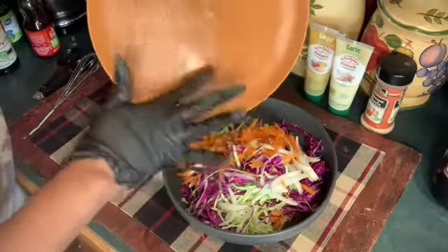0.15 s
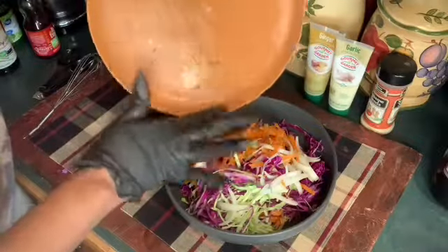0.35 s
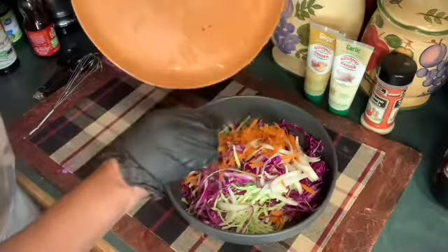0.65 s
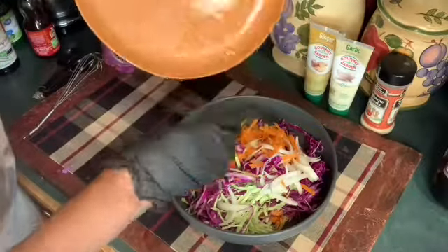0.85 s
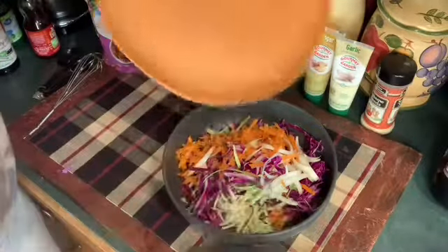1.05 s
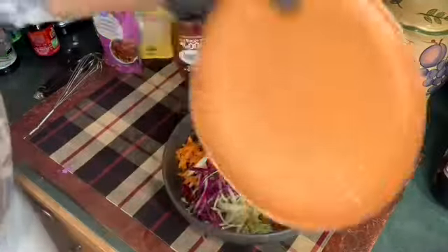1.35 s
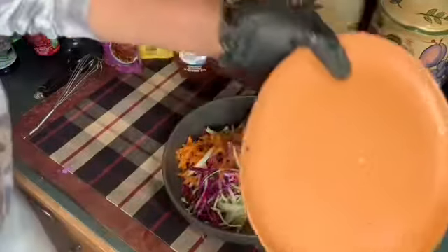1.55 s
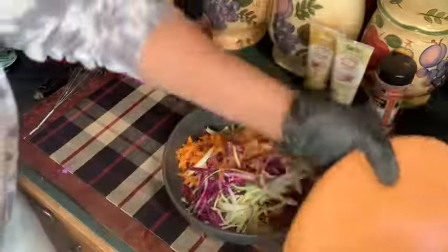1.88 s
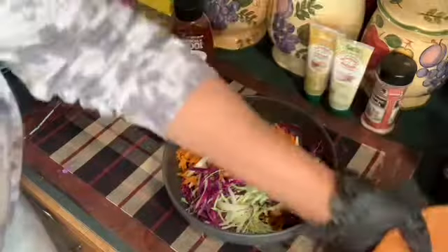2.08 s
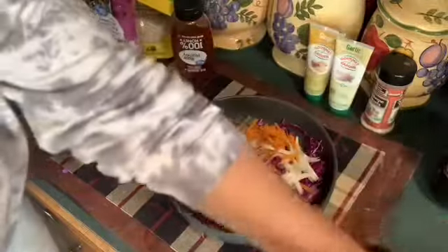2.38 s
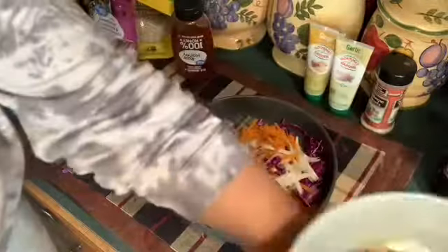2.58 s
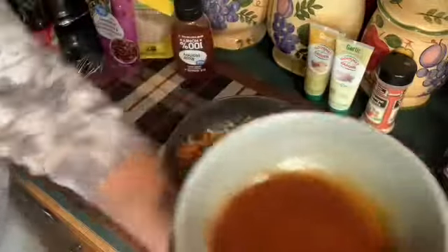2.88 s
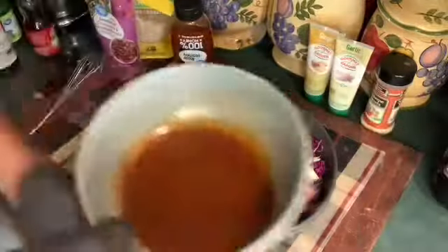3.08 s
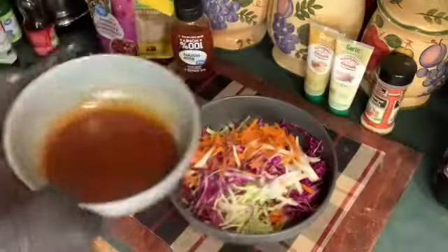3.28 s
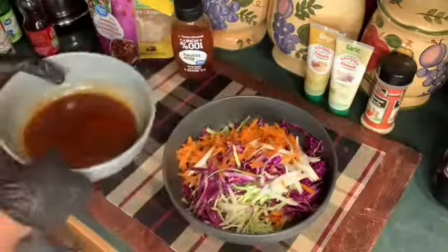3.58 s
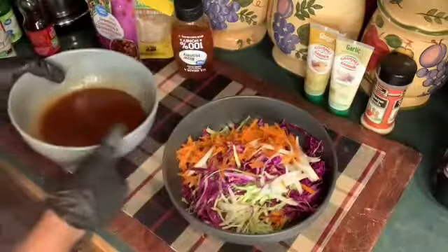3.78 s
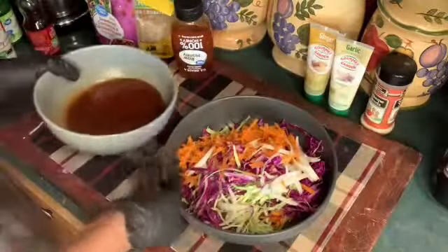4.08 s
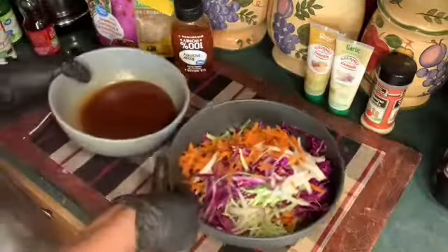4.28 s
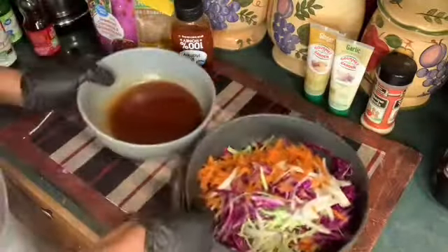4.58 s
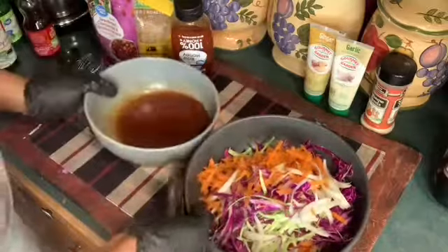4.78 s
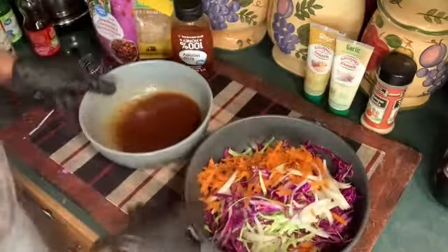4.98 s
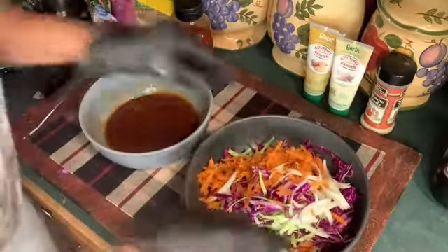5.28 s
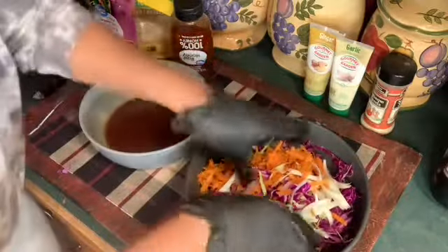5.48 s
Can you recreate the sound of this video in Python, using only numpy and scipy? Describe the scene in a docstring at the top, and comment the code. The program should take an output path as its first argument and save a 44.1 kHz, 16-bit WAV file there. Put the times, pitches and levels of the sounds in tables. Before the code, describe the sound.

Gloved hands wipe vegetable shreds off a plate with a soft, crisp rustle. The plate lands on the counter with a loud, bouncing clatter and a thud. Sleeves swish, then one dish strikes another and rattles briefly. After more faint rubbing, a salad bowl is shoved over a mat with a few dull bumps and small clicks. A fridge hums faintly throughout in the small kitchen, heard close up in stereo.

```python
"""Plate and bowls in a quiet kitchen

Close to a phone, gloved hands wipe shreds off a plate and sleeves rustle: dense tiny slips of friction.
The plate is set down on the counter, a dish clatters as a bowl is fetched, and a salad bowl is shoved
over the mat; each blow rings damped modes. A fridge hums throughout. Two microphone ports give stereo."""
import sys
import numpy as np
from scipy import signal
from scipy.fft import rfft, irfft
from scipy.io import wavfile
from scipy.ndimage import uniform_filter1d

SR = 44100
rng = np.random.default_rng(int(sys.argv[2]) if len(sys.argv) > 2 else 0)


def digitize_waveform(pressure):
    """Quantize a signal to 16-bit integers and store it at the path in sys.argv[1].

    Rows of a 2-D input are taken as channels; values are limited to [-1, 1].
    """
    field = np.atleast_2d(pressure).T
    bounded = np.clip(field, -1, 1)
    quanta = np.round(bounded * 32767).astype(np.int16)
    wavfile.write(sys.argv[1], SR, quanta)


N = 248724
T = np.arange(N) / SR


def undb(db):
    return 10 ** (np.asarray(db, float) / 20)


def add(track, start_s, sound):
    i = int(start_s * SR)
    track[i:i + len(sound)] += sound[:N - i]


def band_gain(points):
    """Gain of a (frequency [Hz], level [dB]) curve per FFT bin; 30 dB down an octave past its ends."""
    hz, db = np.transpose(points)
    hz, db = np.r_[hz[0] / 2, hz, hz[-1] * 2], np.r_[db[0] - 30, db, db[-1] - 30]
    bin_hz = np.arange(N // 2 + 1) * SR / N
    return undb(np.interp(np.log(bin_hz + 1), np.log(hz), db))


def coloured(x, points):
    """Rows of x filtered by a curve, joint rms 1."""
    y = irfft(rfft(x) * band_gain(points), N)
    return y / np.sqrt(np.mean(y ** 2))


def walk(rate_hz):
    """Random steps, smoothed twice."""
    hold = int(SR / rate_hz)
    steps = np.repeat(rng.standard_normal(N // hold + 1), hold)
    return 0.51 * uniform_filter1d(uniform_filter1d(steps, hold), hold)[:N]


def ring(modes, tilt_db_oct, rise_s, rise_cycles=0, scatter_db=1.5):
    """Modes after one blow, peak 2. Harder contact tilts them up; the contact point scatters levels."""
    hz, db, t60_s = np.transpose(modes)[:, :, None]
    t = T[:SR // 2]
    contact, grip = rng.standard_normal((2,) + hz.shape)
    gain = undb(db + tilt_db_oct * np.log2(hz / hz[0]) + scatter_db * contact)
    sign = (-1.) ** np.arange(len(hz))[:, None]
    gripped_hz = hz * (1 + .006 * grip)
    damped_t60_s = np.clip(t60_s, .01, .02 + 60 / hz)  # held or resting: 20 ms + 60 cycles at most
    tones = np.sin(2 * np.pi * gripped_hz * t) * 1000 ** (-t / damped_t60_s)
    swell = 1 - np.exp(-t / np.maximum(rise_s + rise_cycles / hz, 1e-4))
    blow = np.sum(sign * gain * tones * swell, axis=0)
    return 2 * blow / np.abs(blow).max()


def snap(hz, octaves, t60_s):
    """Decaying band of noise, rms 1 over the first 10 ms."""
    t = T[:int(.2 * SR)]
    edges_hz = np.clip(hz * 2. ** np.array([-abs(octaves) / 2 - .05, abs(octaves) / 2]), 50, .45 * SR)
    band = signal.butter(2, edges_hz, "band", fs=SR, output="sos")
    burst = signal.sosfilt(band, rng.standard_normal(len(t))) * 1000 ** (-t / max(t60_s, .003))
    return burst / np.sqrt(np.mean(burst[:SR // 100] ** 2))


def crockery(hits, modes, crack_hz, crack_t60_s):
    """Each contact cracks broadly and rings the ware."""
    out = np.zeros(N)
    for start_s, ring_db, crack_db, tilt_db_oct in hits:
        add(out, start_s, undb(ring_db) * ring(modes, tilt_db_oct, rise_s=0.00031, scatter_db=3))
        add(out, start_s, undb(crack_db) * snap(crack_hz, octaves=1.47, t60_s=crack_t60_s))
    return out


def stroke_db(start_s, swell_s, hold_s, fade_s):
    """Stroke envelope: 0 dB on the hold, 25 dB per swell or fade time, floor -100 dB."""
    before = (start_s + swell_s - T) / max(swell_s, .002)
    after = (T - start_s - swell_s - hold_s) / max(fade_s, .002)
    return -25 * np.clip(np.maximum(before, after), 0, 4)


# Motor lines (frequency [Hz], rms level [dB])
MOTOR_LINES = [(59.3, -54), (194, -70.5), (236.9, -65), (318, -72), (388, -74.5)]
# Fan and house noise (frequency [Hz], relative density [dB])
AIR_SPECTRUM = [(30, -32), (41, -4.5), (62, -2), (93, -18.5), (161, -11.5), (200, -13.5), (240, -11),
                (290, -15), (400, -17), (480, -27), (650, -27.5), (900, -30.5), (1150, -42), (2680, -46),
                (4000, -54.5), (8740, -46.5), (16000, -53)]


def fridge():
    """Wavering motor lines over the rush of fan and house."""
    hum = 0
    for hz, db in MOTOR_LINES:
        amplitude = np.sqrt(2) * undb(db + 0.47 * walk(14))
        hum = hum + amplitude * np.sin(2 * np.pi * hz * T + 0.55 * walk(0.9))
    air = coloured(rng.standard_normal((2, N)), AIR_SPECTRUM) * undb(-57.5 + 0.47 * walk(1.8))
    return air + hum


def friction_slips(echo_t60_s=0.05, echo_db=10, patterns=9):
    """Tiny uneven slips echo off bowls, jars and counter; moving hands crossfade the echo patterns."""
    slips = rng.standard_normal((2, N)) * undb(1.8 * rng.exponential(size=N))
    t = T[:int(.08 * SR)]
    out = 0
    for _ in range(patterns):
        echoes = rng.standard_normal((2, len(t))) * 1000 ** (-t / echo_t60_s)
        echoes = undb(echo_db) * echoes / np.linalg.norm(echoes, axis=1, keepdims=True)
        echoes[:, 0] = 1  # direct path
        weight = undb(39 * walk(7))
        out = out + weight * signal.fftconvolve(rng.permuted(slips, axis=1), echoes, axes=1)[:, :N]
    running_power = uniform_filter1d(np.mean(out ** 2, axis=0), size=SR // 40)
    return out / np.sqrt(running_power)


# Friction colours (frequency [Hz], relative level [dB])
RUSTLE_SPECTRUM = [(1500, -8), (2200, -12.5), (2900, -5), (3500, 2), (4200, 1.5), (5200, 0), (6500, -1),
                   (8500, -13)]
HISS_SPECTRUM = [(6500, -17.5), (8500, -9), (11000, 2.5), (14000, 0.5), (16000, -5)]
SCRAPE_SPECTRUM = [(250, -5), (450, 1.5), (900, -1), (1800, -4.5), (2800, -10)]
# Gloves, sleeves and shreds
# (start [s], swell [s], hold [s], fade [s], rustle [dB], hiss re rustle [dB], scrape re rustle [dB])
HAND_STROKES = [(0.0, 0.00095, 0.0043, 0.069, -68.5, -2.5, -12), (0.135, 0.02, 0.0071, 0.15, -63.5, 4, -12),
                (0.161, 0.05, 0.093, 0.098, -62, 9.5, -28), (0.336, 0.085, 0.065, .08, -72, -2, -29),
                (0.448, 0.044, 0.098, 0.24, -66, 2.5, -13), (0.607, 0.06, 0.041, 0.078, -61.5, 5, -16),
                (0.806, 0.17, 0.12, 0.21, -74.5, -14, -3), (1.086, 0.03, 0.22, .1, -87.5, -5, 4),
                (1.222, 0.2, 0.2, 0.09, -69.5, -6.5, -6), (1.434, 0.14, 0.028, 0.1, -66.5, -11, 4.5),
                (1.948, 0.035, 0.043, 0.071, -48, -18, -0.5), (2.018, 0.056, 0.096, 0.045, -54.5, 4, -9),
                (2.1, 0.062, 0.15, 0.16, -49, -3, -18.5), (2.366, 0.096, 0.11, 0.12, -55.5, -6, -7),
                (2.525, 0.039, 0.024, 0.061, -44, -11, -10), (2.57, 0.019, 0.094, 0.13, -53.5, -17, 8.5),
                (2.719, 0.015, 0.052, 0.16, -64.5, -27, 3.5), (2.836, 0.12, 0.16, 0.26, -72.5, -9, 4.5),
                (3.23, 0.041, 0.068, 0.079, -68.5, -2, -18), (3.348, 0.083, 0.091, 0.094, -73, -14, -19),
                (3.548, 0.07, 0.1, 0.12, -73.5, -6, -5), (3.719, 0.065, 0.053, 0.043, -74, -13.5, -15),
                (3.841, 0.026, 0.041, 0.33, -66.5, -11.5, -10), (3.907, 0.081, 0.15, 0.18, -72, -5, -3),
                (4.124, 0.1, 0.1, 0.11, -79.5, -7.5, -15), (4.436, 0.082, 0.046, 0.023, -75.5, -17, 0),
                (4.686, 0.0059, 0.021, 0.1, -73.5, -16.5, 12.5),
                (4.765, 0.049, 0.13, .06, -67.5, -4.5, -17), (4.803, 0.12, 0.026, 0.092, -69.5, 4.5, 7),
                (4.946, 0.048, 0.028, 0.044, -73.5, -3, -5), (4.999, 0.042, 0.069, 0.081, -69.5, 6, -3),
                (5.127, 0.088, 0.015, 0.22, -69.5, 2, 1), (5.231, 0.064, 0.17, 0.11, -76, -7, -0.5),
                (5.396, 0.026, 0.072, 0.073, -72, -8, 0), (5.47, 0.043, 0.038, 0.15, -66, -3.5, -5),
                (5.583, 0.021, .05, .05, -74, -9, -8)]


def rubbing(slips, rustle_rest_db=-91, hiss_rest_db=-99, scrape_rest_db=-84):
    """Strokes drive the slips in three flickering colours: rustle, fine hiss, dull scrape."""
    power = undb([rustle_rest_db, hiss_rest_db, scrape_rest_db])[:, None] ** 2
    for *times_s, db, hiss_db, scrape_db in HAND_STROKES:
        envelope_db = stroke_db(*times_s)
        power = power + undb([db + envelope_db,
                              db + hiss_db + 1.8 * envelope_db,
                              db + scrape_db + 0.81 * envelope_db]) ** 2
    rustle_gain, hiss_gain, scrape_gain = np.sqrt(power)
    rustle = coloured(slips, RUSTLE_SPECTRUM) * rustle_gain * undb(0.92 * walk(24.27))
    hiss = coloured(slips, HISS_SPECTRUM) * hiss_gain * undb(4 * walk(28))
    scrape = coloured(slips, SCRAPE_SPECTRUM) * scrape_gain * undb(0.6 * walk(8))
    return rustle + hiss + scrape


# Small snaps (time [s], level [dB], centre [Hz], width [oct], t60 [s], top edge level [dB])
TICK_EVENTS = [(0.156, -47.5, 3020, 1.8, 0.065, -68), (0.476, -56.5, 5800, 0.6, 0.018, -57),
               (0.698, -53.5, 4780, 0.87, 0.068, -57), (0.7, -63, 1300, 0.17, 0.032, -80),
               (1.819, -53, 7040, 0.36, 0.015, -86), (1.881, -62.5, 2640, 0.32, 0.033, -86),
               (1.904, -65.5, 6600, 0.19, 0.02, -82), (2.572, -24.5, 1354, 0.1, 0.03, -66),
               (3.247, -66.5, 3555, 0.39, 0.038, -73), (4.273, -60.5, 6910, 0.11, 0.021, -74),
               (4.461, -66.5, 6100, 1.2, 0.099, -89), (4.697, -68, 2220, 1.9, 0.044, -70),
               (4.702, -53.5, 4100, 0.6, 0.11, -64), (4.808, -56.5, 1880, 1.4, 0.0079, -87),
               (4.856, -60, 3660, 1, 0.11, -56.5), (4.921, -43.5, 4070, 0.46, 0.059, -45),
               (4.981, -56, 3930, 0.64, 0.053, -66), (5.208, -72, 4230, 1.6, .04, -62)]


def ticks():
    """Short noise bursts, each with a bright top edge."""
    out = np.zeros(N)
    for start_s, db, hz, octaves, t60_s, top_db in TICK_EVENTS:
        add(out, start_s, undb(db) * snap(hz, octaves, t60_s))
        add(out, start_s, undb(top_db) * snap(11500, octaves=0.75, t60_s=0.0099))
    return out


# Plate contacts (time [s], ring [dB], crack [dB], hardness [dB/oct])
PLATE_CONTACTS = [(.157, -64, -75, -7), (1.598, -57, -65, 12), (1.607, -54, -64, 4), (1.962, -50, -50, 13),
                  (1.9665, -20.5, -31.5, 5.5), (1.969, -18, -42, -4), (1.981, -25, -56, -3.5),
                  (1.998, -37.5, -56, -8), (2.0155, -29, -42.5, 7), (2.021, -26.5, -76, -0.5),
                  (2.035, -36.5, -59, -4), (2.052, -31.5, -53, -8), (2.066, -46, -51, 2.5)]
# Plate modes (frequency [Hz], relative level [dB], t60 before limits [s])
PLATE_MODES = [(390, 1, 0.034), (461, 2, 0.07), (640, -17.5, 0.061), (732, 4.5, 0.037), (1175, -3, 0.067),
               (1632, -3.5, 0.044), (2156, -4.5, 0.05), (2400, -28.5, 0.024), (2640, -0.5, 0.029),
               (3107, -18.5, 0.049), (3380, -9, 0.029), (3670, -21, 0.043), (4380, -17.5, .03),
               (5100, -9.5, 0.0085)]


def plate():
    """A finger taps the plate; later it lands on the counter and bounces."""
    return crockery(PLATE_CONTACTS, PLATE_MODES, crack_hz=6200, crack_t60_s=0.043)


# Faint thin tones (time [s], length [s], frequency [Hz], level [dB])
SQUEAK_TONES = [(.8, 0.097, 1530, -80.5), (.81, 0.065, 2545, -81.5), (2.309, 0.061, 1702, -61),
                (5.064, 0.087, 1536, -73), (5.44, 0.38, 1538, -80)]


def squeaks():
    """Short sines that swell, waver in level and fade."""
    out = np.zeros(N)
    for start_s, length_s, hz, db in SQUEAK_TONES:
        t = T[:int(length_s * SR)]
        arch = np.sin(np.pi * t / length_s) ** .5
        add(out, start_s, 2 * undb(db) * arch * np.sin(2 * np.pi * hz * t))
    return out * undb(8 * walk(25))


# Fingers, counter and dishes dragging on the plate
# (start [s], swell [s], hold [s], fade [s], level [dB], hardness [dB/oct])
DRAG_STROKES = [(1.454, 0.058, 0.027, 0.045, -57.5, -19), (1.522, .04, 0.05, .02, -57.5, -13),
                (1.564, .04, 0.022, 0.049, -64, 8), (2.056, 0.15, 0.15, 0.069, -68.5, -9),
                (2.113, 0.081, 0.027, 0.24, -64, -3), (2.3, 0.035, .05, 0.093, -58.5, -0.5),
                (2.465, 0.048, .07, 0.13, -59, -11.5)]


def plate_drags(slips, held_t60_s=.035):
    """Slips ring the plate while fingers damp it; each grip has its own hardness."""
    t = T[:SR // 10]
    out = 0
    for *times_s, db, tilt_db_oct in DRAG_STROKES:
        held = ring(PLATE_MODES, tilt_db_oct, rise_s=0.0013)[:len(t)] * 1000 ** (-t / held_t60_s)
        body = signal.fftconvolve(slips, held[None], axes=1)[:, :N]
        out = out + body / body.std() * undb(db + stroke_db(*times_s))
    return out * undb(2 * walk(42))


def heavy_blows(hits, modes, rise_cycles):
    """Blows on a heavy body: the low modes swell late."""
    out = np.zeros(N)
    for start_s, db, tilt_db_oct in hits:
        add(out, start_s, undb(db) * ring(modes, tilt_db_oct, rise_s=0.001, rise_cycles=rise_cycles))
    return out


# Landings (time [s], level [dB], hardness [dB/oct])
COUNTER_THUDS = [(1.559, -57, -5), (1.974, -31, -7), (2.021, -38, -11), (2.578, -33.5, 2.5),
                 (2.6, -37.5, -11), (2.616, -32.5, -4.5), (2.645, -41, -4), (2.682, -36.5, 2.5),
                 (2.71, -43, -3.5)]
# Counter modes (frequency [Hz], relative level [dB], t60 before limits [s])
COUNTER_MODES = [(59, -7.5, 0.1), (82.5, -0.5, 0.12), (109.1, 1, 0.18), (149, 10.5, 0.12), (207, 0, 0.086),
                 (260, -1.5, 0.33), (357.6, 0, 0.042)]


def counter():
    """Landing weight rings the counter's low modes."""
    return heavy_blows(COUNTER_THUDS, COUNTER_MODES, rise_cycles=0.78)


# Dish contacts (time [s], ring [dB], crack [dB], hardness [dB/oct])
DISH_CONTACTS = [(2.539, -42, -63, -1), (2.572, -22.5, -31, -0.5), (2.578, -21, -40.5, 5),
                 (2.582, -25, -45, -4), (2.587, -23, -39.5, 4), (2.593, -25, -41, 5.5),
                 (2.599, -29.5, -45.5, -4), (2.605, -31.5, -37.5, 0), (2.613, -31.5, -38.5, -1.5),
                 (2.623, -29.5, -37, -8.5), (2.632, -32.5, -40, -8.5), (2.64, -35, -58, -5),
                 (2.648, -35.5, -50.5, 2.5), (2.657, -40, -51, 0.5), (2.667, -42.5, -51, -6),
                 (2.679, -43, -46, 0), (2.688, -36.5, -47, 9), (2.698, -42, -49.5, 2.5),
                 (2.708, -53, -52, 0), (2.722, -49, -53, 10.5), (2.733, -73, -56, -1)]
# Dish modes (frequency [Hz], relative level [dB], t60 before limits [s])
DISH_MODES = [(378.5, 2, 0.035), (445.5, 2, 0.069), (570, -5, 0.13), (764, -0.5, 0.035), (1017, -9, 0.019),
              (1305, -12.5, 0.039), (1364, -1, 0.08), (1807, -2.5, 0.026), (2088, -5.5, 0.037),
              (2512, -14, 0.03), (3310, -12, 0.04), (3850, -18.5, 0.04), (4230, -15.5, 0.05),
              (4630, -29, .03)]


def dish():
    """Dish strikes dish and clatters on."""
    return crockery(DISH_CONTACTS, DISH_MODES, crack_hz=2600, crack_t60_s=0.026)


# Bumps on the mat (time [s], level [dB], hardness [dB/oct])
BOWL_BUMPS = [(4.471, -50.5, -4), (4.515, -49, -6.5), (4.696, -31, -1), (4.716, -47, -9.5),
              (4.748, -41, -18), (4.79, -61, -22), (4.916, -35, -0.5), (4.928, -39, -9), (4.962, -45.5, 4),
              (4.975, -38, -14), (5.016, -41.5, -12), (5.06, -51, -23)]
# Bowl modes (frequency [Hz], relative level [dB], t60 before limits [s])
BOWL_MODES = [(67.5, 0.5, 0.16), (92, -8.5, 0.12), (125, 5, 0.075), (204, 8.5, 0.072), (329, -26, 0.08),
              (373, -10.5, 0.04), (590, -5, 0.017), (806, -14, 0.036)]


def salad_bowl():
    """The shoved bowl bumps over the mat, ringing low."""
    return heavy_blows(BOWL_BUMPS, BOWL_MODES, rise_cycles=0.68)


def room(x, t60_s=0.3, tail_db=-10.5, lowpass_hz=3240):
    """Direct sound plus a dense tail, separate for mid and side."""
    t = T[:int(.6 * SR)]
    tail = rng.standard_normal((2, len(t))) * 1000 ** (-t / t60_s) * np.minimum(t / 0.0014, 1)
    tail = signal.lfilter(*signal.butter(1, lowpass_hz, fs=SR), tail)
    tail = undb(tail_db) * tail / np.linalg.norm(tail, axis=1, keepdims=True)
    direct = np.array([x, signal.hilbert(x).imag])  # spaced ports: side is 90 degrees off mid
    return direct + signal.fftconvolve(x[None], tail, axes=1)[:, :N]


# Port pair, cancelling near 9 kHz (frequency [Hz], side re mid [dB])
PORT_SIDE = [(60, -15), (110, -15), (200, -7.5), (380, -5.5), (700, 3), (1300, -3), (2400, 1), (4400, 0),
             (6500, 0.5), (7800, 8), (9200, 26.5), (10300, 8), (11800, 1.5), (13000, -26)]
# Port imbalance (frequency [Hz], left re right [dB])
PORT_BALANCE = [(60, -1.5), (120, -0.5), (200, -1), (360, 4.5), (520, 1.5), (750, 1.5), (1300, -1.5),
                (2400, -0.5), (16000, -0.5)]


def microphone_ports(arrivals):
    """Two ports split the power between mid and side; the left is stronger in the low mids."""
    side_gain = band_gain([(15, PORT_SIDE[0][1])] + PORT_SIDE + [(20000, PORT_SIDE[-1][1])])
    shares = np.array([np.ones_like(side_gain), side_gain]) / np.sqrt(1 + side_gain ** 2)
    mid, side = rfft(arrivals) * shares
    left_gain = np.sqrt(band_gain([(15, PORT_BALANCE[0][1])] + PORT_BALANCE + [(22000, 0)]))
    return irfft([(mid + side) * left_gain, (mid - side) / left_gain], N)


def scene():
    """Blows, ticks and squeaks in the room, plus friction and fridge, in stereo."""
    events = room(plate() + dish() + counter() + salad_bowl() + ticks() + squeaks())
    slips = friction_slips()
    friction = np.sqrt(2) * (rubbing(slips) + plate_drags(slips))
    return microphone_ports(events + friction + fridge())


def record(dry, highpass_hz=43.3, lowpass_hz=16000):
    """The phone drops the deepest bass and cuts the top."""
    thin = signal.sosfilt(signal.butter(3, highpass_hz, "high", fs=SR, output="sos"), dry)
    return signal.sosfilt(signal.ellip(10, .2, 80, lowpass_hz, fs=SR, output="sos"), thin)


dry = scene()
out = record(dry)
digitize_waveform(out)
```